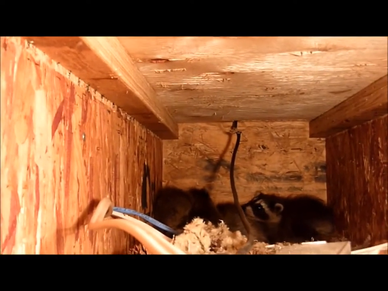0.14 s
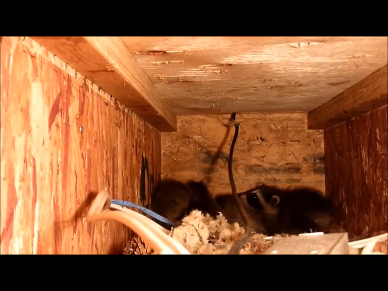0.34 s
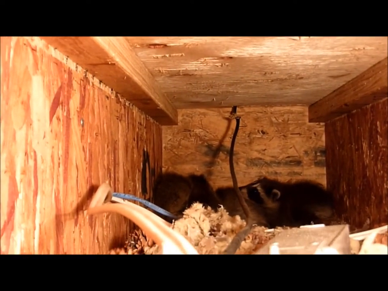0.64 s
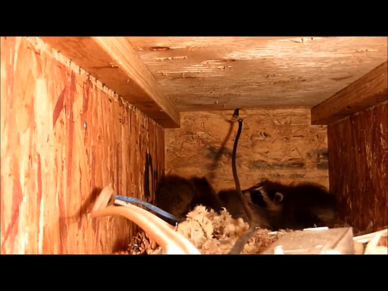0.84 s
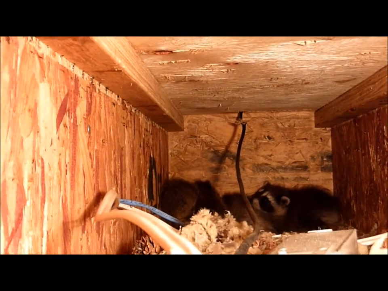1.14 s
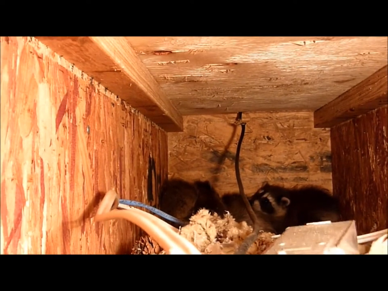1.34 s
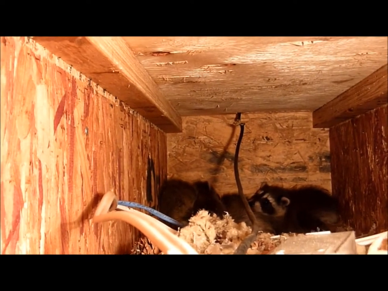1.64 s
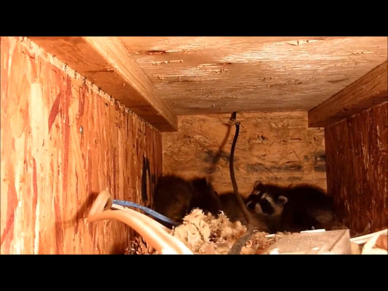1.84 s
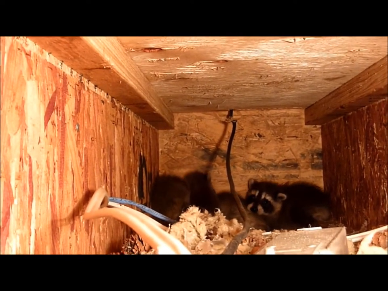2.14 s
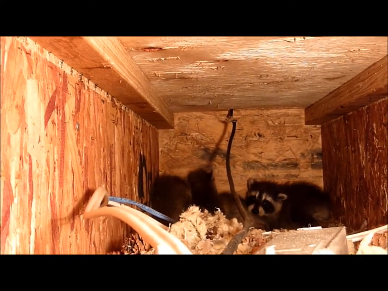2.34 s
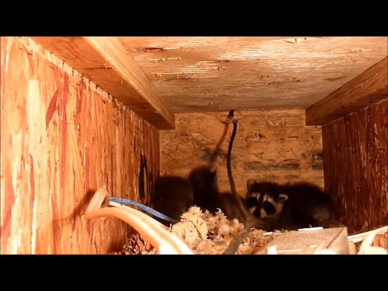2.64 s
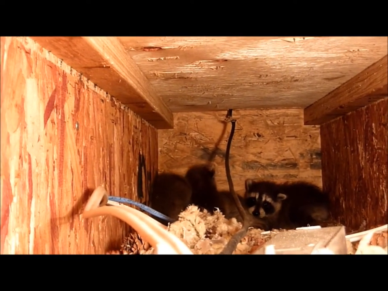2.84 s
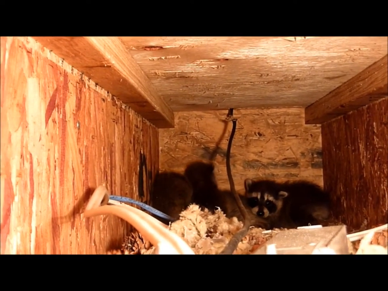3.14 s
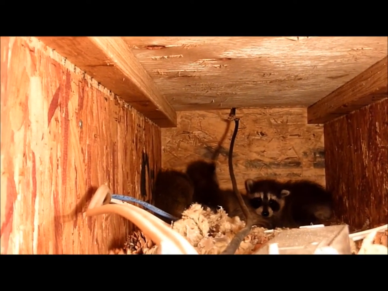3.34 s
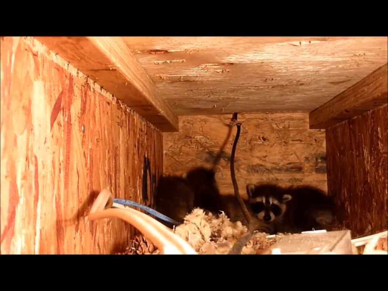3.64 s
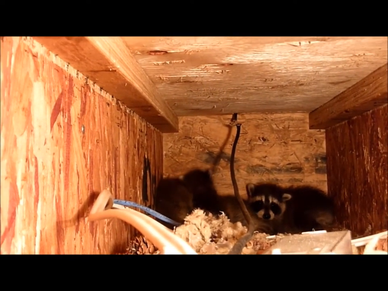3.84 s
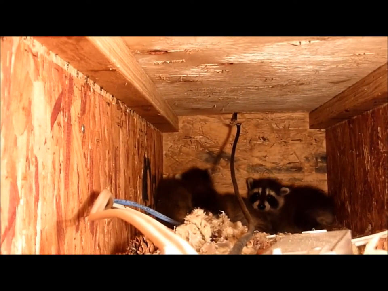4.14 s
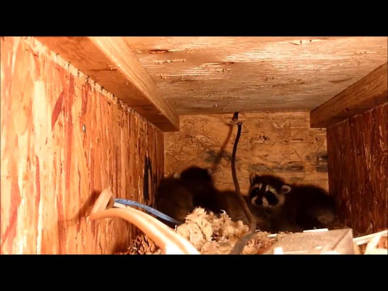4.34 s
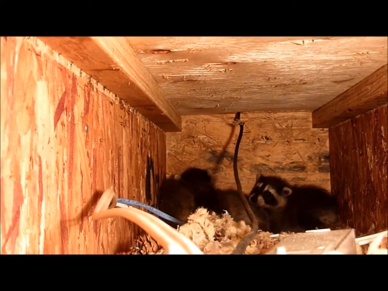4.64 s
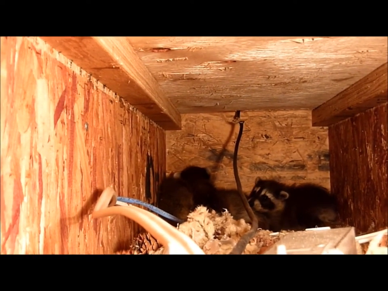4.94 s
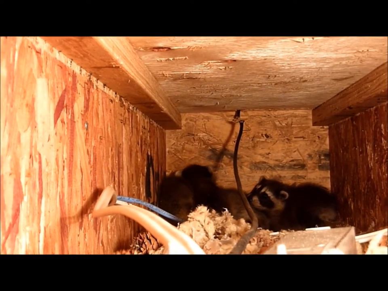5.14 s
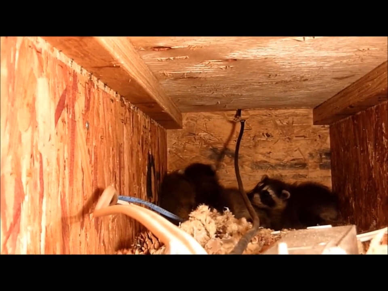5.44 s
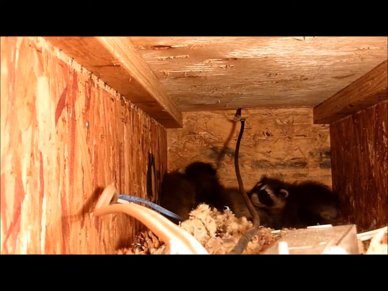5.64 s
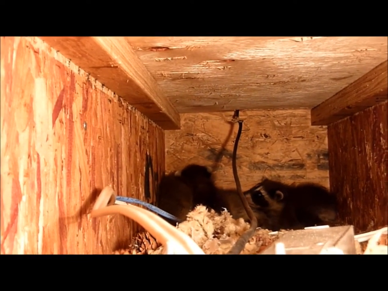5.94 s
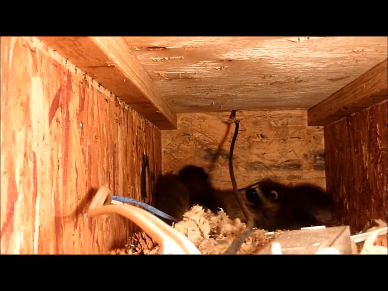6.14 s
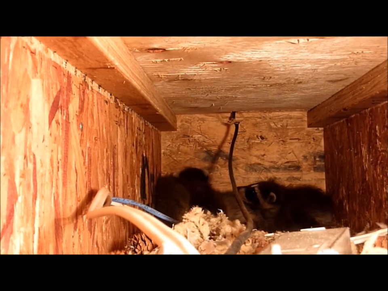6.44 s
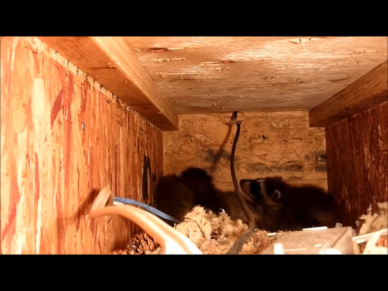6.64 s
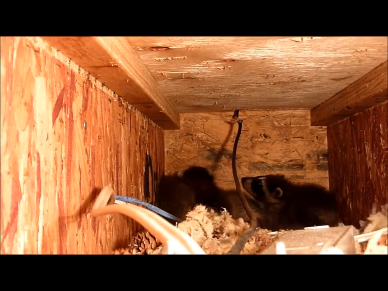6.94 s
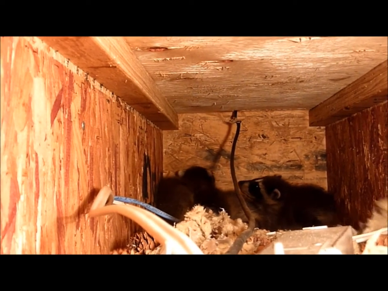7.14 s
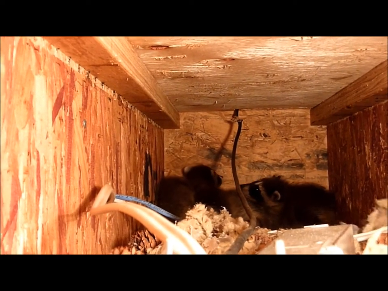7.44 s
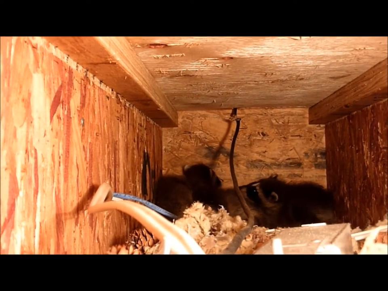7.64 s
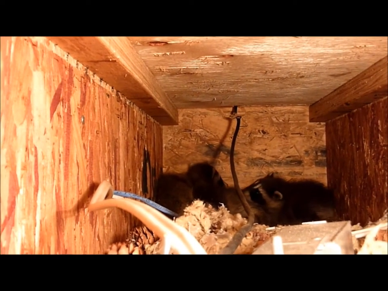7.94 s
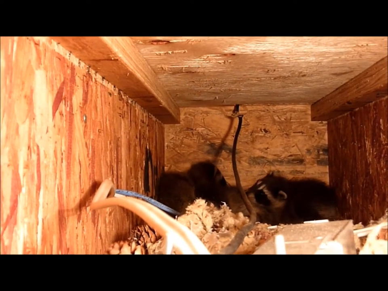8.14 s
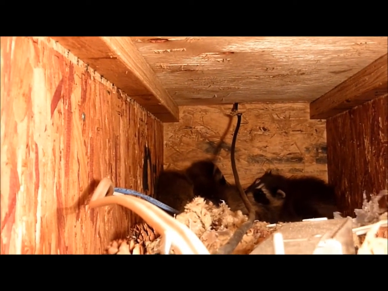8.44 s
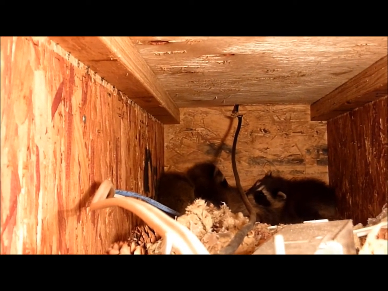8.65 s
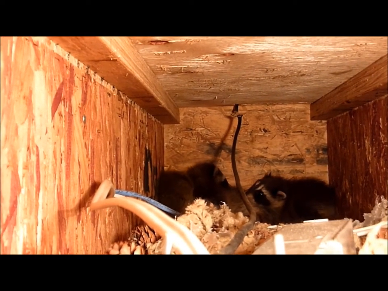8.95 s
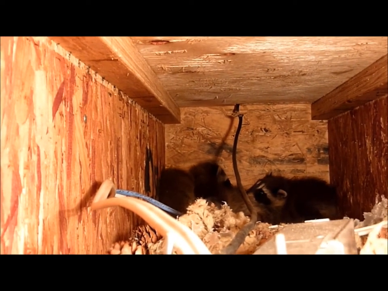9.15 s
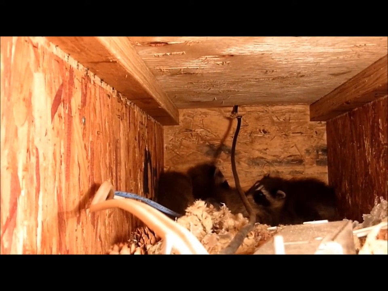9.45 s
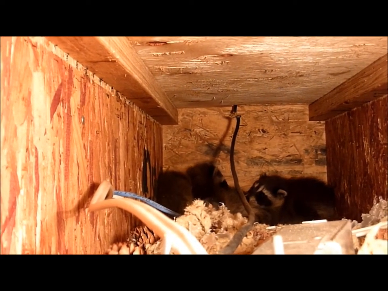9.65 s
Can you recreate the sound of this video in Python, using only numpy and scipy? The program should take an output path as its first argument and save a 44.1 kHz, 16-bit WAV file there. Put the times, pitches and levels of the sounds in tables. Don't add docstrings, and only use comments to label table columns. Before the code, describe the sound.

A young raccoon churrs close to a small microphone at the opening of a hollow plywood cavity. Three airy low grunts come in the first 0.45 s, then a rest until 0.9, when two weak ones lead into a steady run from 1.2 s. Grunts follow at six or seven a second, each under a tenth of a second, soft and rounded, the pitch arching up and down around 150 to 250 Hz, with throaty rasp, faint mouth hiss and chest thumps. Some burst open with a low pop. Faint dry creaks come around 1.6 to 2.1 s. The pulse slows at 4.4 to 5.2 s, then grows quick and strong, weakening near 7.8 to 8.1. A last bout starts at 8.3; claws scrabble in litter at 8.6, a creak and loud grunts come near 9, and it dwindles by 9.7. The box resonates briefly; dull distant building rumble gradually fades.

```python
import sys
import numpy as np
from scipy import signal
from scipy.fft import rfft, irfft, next_fast_len
from scipy.io import wavfile
from scipy.ndimage import uniform_filter1d

SR = 44100
rng = np.random.default_rng(int(sys.argv[2]) if len(sys.argv) > 2 else 0)


def transcribe(signal):
    frames = np.atleast_2d(signal).T
    limited = np.clip(frames, -1, 1)
    pcm = np.round(limited * 32767).astype(np.int16)
    wavfile.write(sys.argv[1], SR, pcm)


def volts_from_db(level):
    exponent = np.asarray(level, float) / 20
    return 10 ** exponent


N = 431738
T = np.arange(N) / SR
SIZE = next_fast_len(N + SR)


def curve(table):
    hz, db = np.transpose(table)
    return np.interp(np.log(np.fft.rfftfreq(SIZE, 1 / SR) + 1), np.log(hz + 1), db)


def noise(table):
    white = rfft(rng.standard_normal(SIZE))
    x = irfft(white * volts_from_db(curve(table)), SIZE)[:N]
    return x / x.std()


def walk(rate):
    k = int(SR / rate)
    x = uniform_filter1d(uniform_filter1d(rng.standard_normal(N), k), k)
    x = x - uniform_filter1d(x, 5 * k)
    return x / x.std()


def hump(start, length, rise, fall):
    first = max(int((start - rise) * SR), 0)
    last = min(int((start + length + 4 * fall) * SR), N)
    i = np.arange(first, last)
    opening = np.sin(np.pi / 2 * np.clip((T[i] - start + rise) / (2 * rise), 0, 1)) ** 2
    closing = np.exp(-(np.clip(T[i] - start - length + fall, 0, None) / (2 * fall)) ** 2)
    return i, (T[i] - start) / length, opening * closing


def add_swing(out, start, db, hz, t60):
    first = int(start * SR)
    t = T[:min(int(t60 * SR), N - first)]
    out[first:first + len(t)] += volts_from_db(db) * np.sin(2 * np.pi * hz * t) * np.exp(-np.log(1000) * t / t60)


# hz, side_minus_mid_db
WIDTH = [(60, -29), (100, -35), (180, -42.5), (300, -33), (520, -19.5), (900, -18), (1540, -9.5),
         (2640, -9), (4540, -3), (7800, -3.5)]
# hz, level_db_per_hz
HOUSE_COLOUR = [(15, -12.5), (25, -4.5), (239, 1.5), (276, -2.5), (438, -9), (1340, -23), (3530, -28.5),
                (3890, -29), (5330, -34.5), (7310, -36.5), (8250, -55), (10700, -81.5), (18200, -120)]
# time_s, level_db
HOUSE_LEVEL = [
    (0, -41),
    (.7, -45),
    (4.6, -48.5),
    (5.15, -45),
    (8.2, -50),
    (9.79, -55.5),
]


def house():
    level = volts_from_db(np.interp(T, *np.transpose(HOUSE_LEVEL)) + 0.39 * walk(3.2))
    mid = rfft(level * noise(HOUSE_COLOUR), SIZE)
    side = rfft(level * noise(HOUSE_COLOUR), SIZE)
    return mid, side * volts_from_db(curve(WIDTH) + 4.0)


# start_s, length_s, level_db, top_pitch_hz, air_db
GRUNT_ROWS = [
    (0.036, 0.11, -14, 178, -21),
    (0.19, 0.11, -17.5, 203, -21.5),
    (0.351, 0.087, -17.5, 178, -24),
    (0.902, 0.063, -21.5, 182, -26.5),
    (1.054, 0.061, -25.5, 186, -23),
              (1.181, 0.12, -15, 144.5, -30.5), (1.365, 0.077, -15, 231, -23),
              (1.479, 0.085, -11, 233, -26.5), (1.612, 0.1, -18.5, 217, -25.5),
              (1.762, 0.11, -16, 200.3, -27.5), (1.911, 0.099, -14, 246.7, -26.5),
              (2.068, 0.078, -12.5, 251.6, -32), (2.23, 0.092, -9.5, 147.3, -29),
              (2.397, 0.088, -13.5, 194.8, -26.5), (2.534, 0.066, -10, 245, -26.5),
              (2.693, 0.093, -12.5, 219.5, -30), (2.852, 0.1, -12, 234, -29.5),
              (2.988, 0.098, -12.5, 224.7, -33), (3.154, 0.1, -10.5, 232.9, -28),
              (3.297, 0.074, -12.5, 227, -29), (3.465, 0.057, -10.5, 203.4, -25),
              (3.6, 0.074, -9, 227.8, -33), (3.766, 0.068, -10.5, 234.8, -27),
              (3.89, 0.11, -11.5, 214.2, -30), (4.071, 0.085, -18.5, 198, -24),
              (4.227, 0.077, -10, 190, -27), (4.416, 0.085, -23, 193.6, -26.5),
              (4.709, 0.075, -13, 189.2, -29.5), (4.994, 0.06, -13, 268.2, -26),
               (5.237, 0.075, -13, 188.7, -26), (5.401, 0.058, -8.5, 200.3, -22),
               (5.509, 0.049, -7, 236.3, -25.5), (5.652, 0.035, -8.5, 227.6, -25),
               (5.753, 0.096, -13, 225.2, -28), (5.899, 0.068, -11, 266.4, -23.5),
               (6.019, 0.077, -11, 262, -26), (6.162, 0.048, -9.5, 224, -25.5),
               (6.285, 0.077, -14.5, 250, -25), (6.418, 0.063, -11, 241, -26.5),
               (6.547, 0.058, -8.5, 207, -30), (6.683, 0.077, -12.5, 273, -26.5),
               (6.817, 0.07, -12, 213.4, -27.5), (6.955, 0.074, -10.5, 246.4, -28),
               (7.09, 0.05, -11, 207, -31.5), (7.231, 0.056, -11, 256, -28.5),
               (7.356, 0.074, -12, 221, -30), (7.503, 0.086, -20.5, 216.3, -27.5),
               (7.637, 0.058, -9.5, 250.5, -32), (7.765, 0.099, -17.5, 190.8, -30),
               (7.932, 0.1, -20.5, 180.4, -31), (8.094, 0.066, -24.5, 193.3, -33.5),
              (8.301, 0.07, -15.5, 146, -29.5),
    (8.434, 0.12, -13, 203.2, -24.5),
    (8.609, 0.067, -14, 179.3, -21.5),
    (8.775, 0.1, -15, 186.8, -27),
    (8.922, 0.044, -9.5, 190, -22.5),
    (9.067, 0.054, -8, 186.4, -25.5),
    (9.177, 0.085, -12.5, 201.6, -27),
    (9.326, 0.083, -19.5, 200.6, -26.5),
    (9.472, 0.073, -11.5, 181.2, -23),
    (9.585, 0.071, -32, 180, -39.5),
]
GRUNT = GRUNT_ROWS
REST_S = .2
# time_s, mouth_hiss_over_rasp_db, hoarseness_0_to_1
THROAT = [(0.05, -22, .2), (1.05, -19.5, 0), (1.2, -23.5, 0.2), (1.62, -24, 0.4), (2.0, -23.5, .05),
          (2.9, -23.5, 0.22), (3.2, -27.5, 0.19), (3.902, -26.5, 0.24), (4.7, -24.5, 0.4),
          (5.001, -19.5, 0), (5.25, -23, 0.7), (5.5, -27.5, .12), (6.001, -24, 0.22), (6.5, -24.5, 0.26),
          (7.3, -22.5, 0.19), (8.1, -20.5, 0), (8.6, -24, .25), (9.5, -22.5, 0.2)]
AIR_LEAD_S, AIR_EXTRA_S, AIR_PEAK = 0.011, 0.012, 0.42
GASP_LEAD_S, GASP_PEAK = 0.024, 0.7
GASP_RISE_S, FLOW_RISE_S = 0.0043, 0.032


def puffs():
    start, length, _, _, air_db = np.transpose(GRUNT)
    at, mouth_db, _ = np.transpose(THROAT)
    rested = np.diff(start, prepend=0) > REST_S
    lead = np.where(rested, GASP_LEAD_S, AIR_LEAD_S)
    rise = np.where(rested, GASP_RISE_S, FLOW_RISE_S)
    peak = np.where(rested, GASP_PEAK, AIR_PEAK)
    flow_length = length + lead + AIR_EXTRA_S - AIR_LEAD_S
    return zip(start - lead, flow_length, rise, peak, air_db, np.interp(start, at, mouth_db))


# time_s, level_db
HEAVE = [(0.08, -18), (0.376, -10.5), (0.918, -21), (1.191, -26.5), (2.83, -23.5), (4.699, -27.5),
         (5.25, -27.5), (7.37, -30), (7.921, -28.5), (8.299, -34), (8.918, -25.5), (9.171, -30)]
HEAVE_S = .05
CHEST_DB, CHEST_SAG_DB_PER_S = -38, -.9


def chest(flow):
    panting = uniform_filter1d(flow, int(.2 * SR))
    size = (1.2 * panting + flow) * volts_from_db(CHEST_DB + CHEST_SAG_DB_PER_S * T)
    for s, db in HEAVE:
        i, _, gate = hump(s - HEAVE_S / 2, HEAVE_S, rise=0.023, fall=0.024)
        size[i] += gate * volts_from_db(db)
    return size


# hz, level_db_per_hz
RASP = [(60, -24.5), (110, -5), (210, 3), (300, -6), (440, -7), (530, -11), (800, -21), (1000, -32),
        (1400, -33), (2000, -67)]
HISS = [(700, 7), (1300, 5.5), (1900, -2), (2450, -2.5), (3300, -8.5), (4900, -10), (5800, -12.5),
        (6800, -17.5), (7900, -24.5)]
THUMP = [(15, -16), (32, -4), (55, 0), (85, -3), (125, -20), (300, -90)]


def breath(beat):
    rasp, hiss, flow = np.zeros((3, N))
    for s, length, rise, peak, rasp_db, hiss_db in puffs():
        i, u, gate = hump(s - .008, length + 0.0033, rise, fall=0.015)
        swell = gate * volts_from_db(-16.0 * (np.clip(u, 0, 1) - peak) ** 2)
        flow[i] += swell
        rasp[i] += swell * volts_from_db(rasp_db)
        i, u, gate = hump(s - .008, length + 0.015, rise, fall=0.0049)
        hiss[i] += gate * volts_from_db(rasp_db + hiss_db - 26.0 * (np.clip(u, 0, 1) - peak) ** 2)
    grain = volts_from_db(2.1 * walk(80))
    air = volts_from_db(4.5) * rasp * noise(RASP) * grain
    gust = volts_from_db(1.4 * walk(89))
    for k in range(1, len(HISS) - 1, 2):
        stretch = HISS[k - 1:k + 2]
        (low_hz, low_db), (_, db), (top_hz, top_db) = stretch
        band = noise([(0.98 * low_hz, low_db - 24.0), *stretch, (1.0 * top_hz, top_db - 39.0)])
        band = band * volts_from_db(1.4 * walk(50) + 1.6 * walk(2.5))
        band_db = 3.0 + db + 10 * np.log10((top_hz - low_hz) / 2000)
        air += volts_from_db(band_db) * hiss * gust * band
    thump = chest(flow) * volts_from_db(2.2 * walk(15)) * noise(THUMP)
    return (1 + 0.5 * beat) * air + thump


# multiple, level_db
OVERTONES = [(2, -23.5), (3, -33), (4, -43.5)]
SLACK_HZ, START_SHARE, END_SHARE = 154.6, .15, 0.33
FADE_DB = -3.5
POP_FADE_DB, POP_START_SHARE = -6, -.05
FIRM_DB, ROUGH_PER_DB = -10.5, 0.07
RESTING_DB = -5.5


def voice():
    out, beat = np.zeros(N), np.zeros(N)
    shake, flutter = walk(70), walk(58)
    rumble = noise([(70, -26.5), (130, 6.5), (210, 5.5), (270, 11.5), (340, -58.5)])
    murmur = noise([(90, -21), (125, 13.0), (150, 23.5), (200, -14), (280, -53.0)])
    at, _, hoarse = np.transpose(THROAT)
    rests = np.diff(np.transpose(GRUNT)[0], append=99) > REST_S
    for (s, length, db, top_hz, _), rest in zip(GRUNT, rests):
        popped = any(abs(p - s) < .012 and pop_db > -13 for p, pop_db in POP)
        i, u, gate = hump(s, length, rise=.004 if popped else .009, fall=0.02)
        u = np.clip(u, -.1, 1.3)
        rough = np.interp(s, at, hoarse) + ROUGH_PER_DB * (FIRM_DB - db)
        rough = np.clip(rough, 0, 1)

        start_hz = SLACK_HZ + (POP_START_SHARE if popped else START_SHARE) * (top_hz - SLACK_HZ)
        end_hz = SLACK_HZ + END_SHARE * (top_hz - SLACK_HZ)
        hz = start_hz * (1 - u) * (1 - 2 * u) + 4 * top_hz * u * (1 - u) + end_hz * u * (2 * u - 1)
        shaken_hz = np.clip(hz, 80, 320) * (1 + .16 * rough * shake[i])
        phase = 2 * np.pi * np.cumsum(shaken_hz) / SR

        tone = np.sin(phase)
        for k, overtone_db in OVERTONES:
            tone += volts_from_db(overtone_db + 4.6 * shake[i]) * np.sin(k * phase + 1.2 + 0.48 * flutter[i])
        tone = np.sqrt(2) * tone * volts_from_db((.7 + 4.0 * rough) * flutter[i])
        fade_db = POP_FADE_DB if popped else FADE_DB
        effort = volts_from_db(db + fade_db * (u - .5) - 16.2 * (u - .4) ** 2)
        blend = np.sqrt(1 - rough ** 2) * tone + 1.23 * rough ** 1.66 * rumble[i]
        out[i] += gate * effort * blend
        beat[i] += gate * (1 - rough) * np.cos(phase)

        i, _, gate = hump(s + 0.62 * length, 0.08, rise=0.014, fall=0.0097)
        out[i] += gate * volts_from_db(db - 15.5 + rest * RESTING_DB) * murmur[i]
    return out, beat


# time_s, dull_peak_db, bright_over_dull_db
TICK = [(0.0425, -39, -9.5), (1.4382, -39.5, -3.5), (1.4894, -31, -19), (1.6153, -39, -25),
        (1.6914, -55, 8.5), (1.777, -58, 15.5), (2.0727, -44, -9.5), (2.2255, -44.5, -17),
        (3.733, -33.5, -25), (8.403, -34.5, -28.5), (8.4114, -52, -16), (8.598, -58.5, -1.5),
        (8.6097, -59, 12.5), (8.6207, -30, -5.5), (8.6328, -33.5, -11.5), (8.645, -31.5, -9),
        (8.658, -25.5, -6), (8.6735, -30.5, -16), (8.9194, -27.5, -17.5), (9.2252, -32.5, -16.5),
        (9.706, -48, -23), (9.7418, -50, -43), (9.7514, -45, -29), (9.7725, -55.5, -27)]


def litter_ticks():
    dull, bright = np.zeros((2, N))
    for s, db, bright_db in TICK:
        add_swing(dull, s, db, 90., .012)
        add_swing(bright, s, db + bright_db, 90., .012)
    dull_noise = noise([(1500, -19), (2800, 0), (3600, 0.5), (4800, -12.5), (5500, -19.0)])
    bright_noise = noise([(5300, -12.5), (6200, 3), (6900, 4), (7600, -8.0), (8200, -29)])
    return volts_from_db(1.0) * dull * dull_noise + volts_from_db(9.0) * bright * bright_noise


# time_s, peak_db
POP = [(0.355, -2.5), (1.183, 2.5), (1.484, -23.5), (2.071, 1), (2.699, -6), (2.853, 2), (2.995, -7),
       (3.166, -14), (3.468, -6.5), (3.605, -9.5), (5.407, 5.5), (5.508, -1.5), (5.657, -24), (5.762, 5),
       (6.309, -5.5), (6.427, 1), (6.549, -6.5), (6.816, -20), (7.09, 0.5), (7.232, -15), (7.639, -5),
       (8.926, 2), (9.184, -14)]


def fold_pops():
    out, spit = np.zeros((2, N))
    for s, db in POP:
        add_swing(out, s + .007, db - 9.5, 170., .03)
        add_swing(spit, s + 0.00087, db - 17.5, 25., .05)
    return out + spit * noise([(200, -9.0), (450, 4.5), (900, -12.0), (2500, -33), (6000, -44.0)])


# time_s, peak_db
CREAK = [
    (0.955, -55),
    (1.487, -47),
    (1.615, -34.5),
    (1.811, -33.5),
    (1.995, -43.5),
    (2.072, -33),
    (8.919, -30),
]
CREAK_HZ, CREAK_T60_S = 2070, 0.036


def stalk_creaks():
    out = np.zeros(N)
    for s, db in CREAK:
        add_swing(out, s, db, CREAK_HZ, CREAK_T60_S)
    return out


# pitch_hz, level_db, t60_s
BOX = [(62, -28.5, 0.056), (142.9, -12, 0.28), (217, -35.5, 0.48), (372, -22.5, 0.087), (469, -15.5, 0.072)]
# centre_hz, width_hz, gain_db
WALLS = [(615, 30, -8), (850, 110, 5), (1390, 140, 4), (1475, 40, -7), (1620, 80, 3), (1900, 90, 4),
         (2210, 80, -6), (2480, 200, 5), (2950, 120, 4), (3620, 120, 4), (6380, 100, 5), (6850, 200, 5)]


def cavity(x):
    modes = np.zeros(N)
    for hz, db, t60 in BOX:
        add_swing(modes, 0, db + 20 * np.log10(2 * np.log(1000) / t60 / SR), hz, t60)
    tail = noise([(100, -24), (350, -10), (1000, -7.5), (8000, -9.5)]) * np.exp(-np.log(1000) * T / .22)
    mid = modes * volts_from_db(14.5) + volts_from_db(-44) * tail
    mid[0] += 1
    bins = np.fft.rfftfreq(SIZE, 1 / SR)
    walls_db = sum(db / (1 + (2 * (bins - hz) / width) ** 2) for hz, width, db in WALLS)
    heard = rfft(x, SIZE) * volts_from_db(walls_db)
    echoes = rng.standard_normal(N) * np.exp(-np.log(1000) * T / 0.085)
    side = rfft(echoes / np.sqrt(np.sum(echoes ** 2)), SIZE) * volts_from_db(curve(WIDTH))
    return heard * rfft(mid, SIZE), heard * side


# hz, left_minus_right_db
TILT = [(300, 0), (1000, -1), (8000, -1)]


def scene():
    note, beat = voice()
    inside = note + breath(beat) + litter_ticks() + fold_pops() + stalk_creaks()
    mid, side = np.add(cavity(inside), house())
    lean = volts_from_db(curve(TILT) / 2)
    left = irfft((mid + side) * lean, SIZE)[:N]
    right = irfft((mid - side) / lean, SIZE)[:N]
    return np.array([left, right])


def band_limit(x):
    return signal.sosfilt(signal.butter(12, 8400, fs=SR, output="sos"), x)


def record(dry):
    x = np.clip(.92 * dry, -.93, .93)
    x = signal.lfilter(*signal.iirnotch(5400., 10., SR), x)
    x = signal.sosfilt(signal.butter(2, 38., "high", fs=SR, output="sos"), x)
    x = signal.sosfilt(signal.cheby1(7, .3, 7350, fs=SR, output="sos"), x)
    return band_limit(x)


dry = scene()
out = record(dry)
transcribe(out)
```